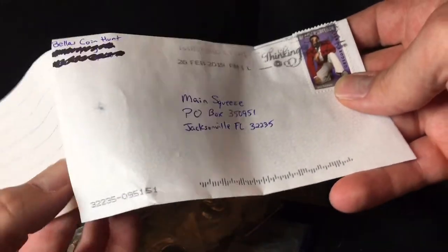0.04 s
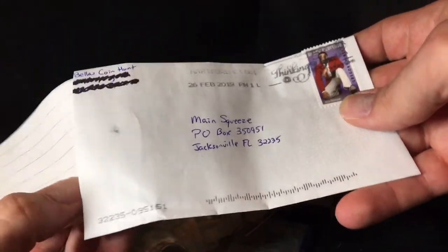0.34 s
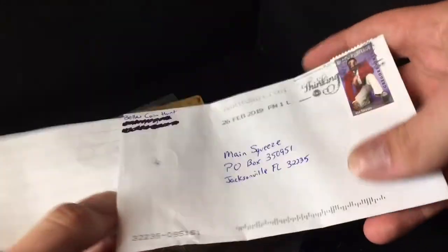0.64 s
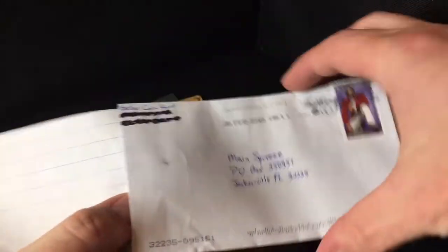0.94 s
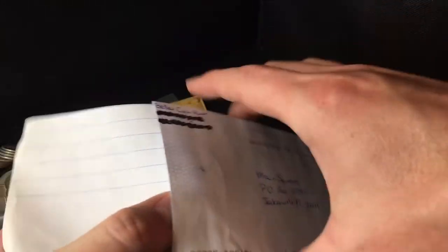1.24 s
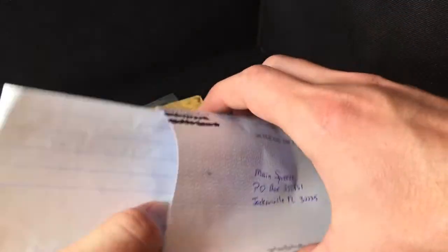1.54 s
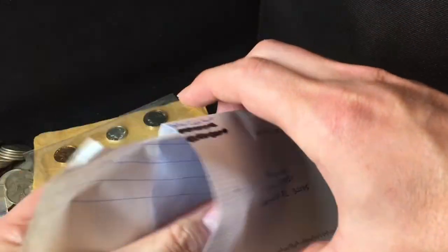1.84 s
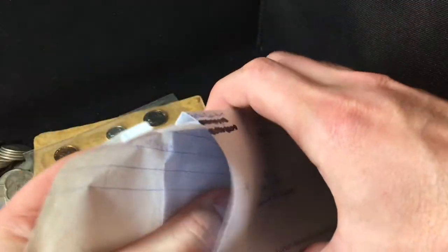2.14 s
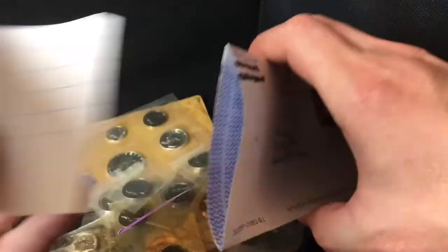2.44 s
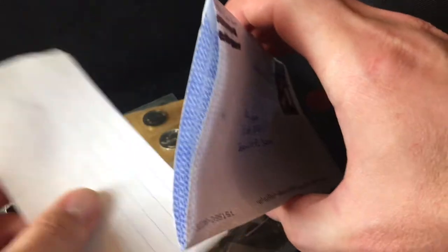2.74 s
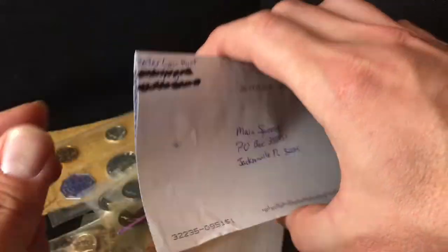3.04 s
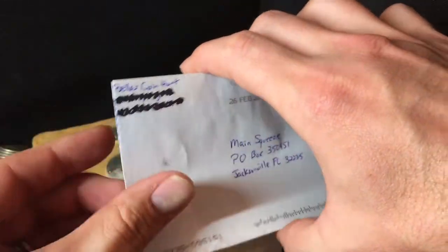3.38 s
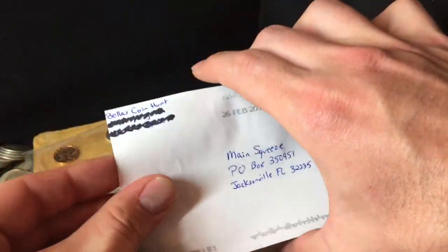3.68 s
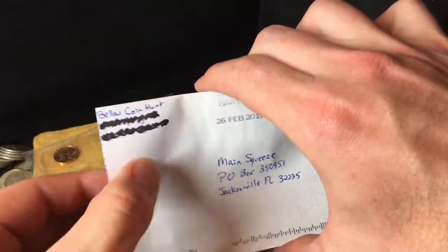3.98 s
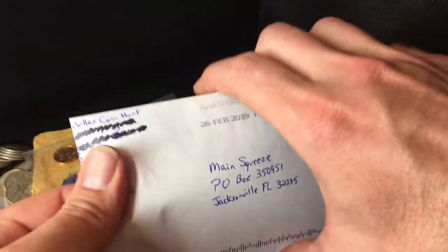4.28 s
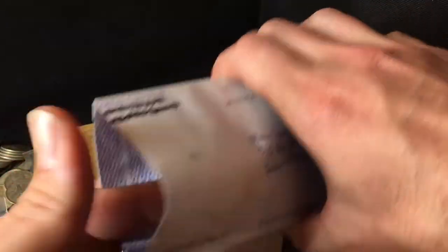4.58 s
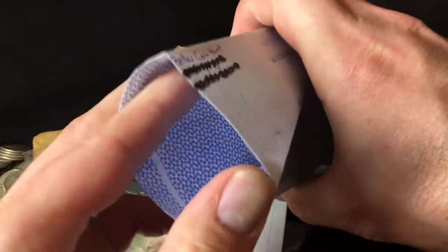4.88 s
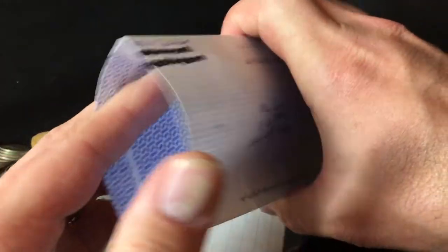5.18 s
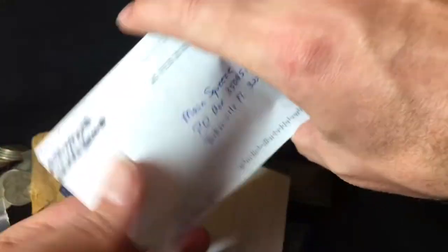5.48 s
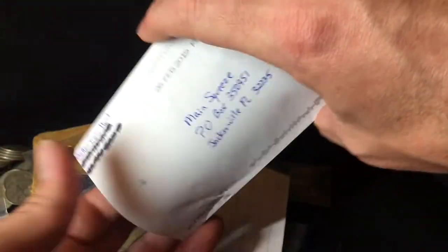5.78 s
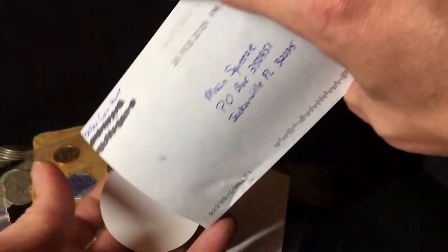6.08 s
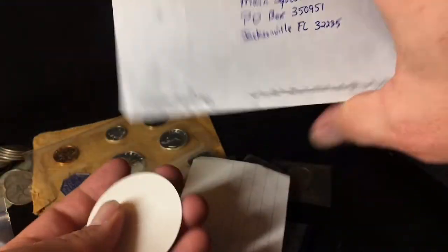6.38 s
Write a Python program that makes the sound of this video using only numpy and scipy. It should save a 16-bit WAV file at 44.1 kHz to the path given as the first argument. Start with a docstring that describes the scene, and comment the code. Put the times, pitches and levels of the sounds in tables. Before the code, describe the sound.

Hands pull a letter from a paper envelope and bend it open, with close rubbing, crisp crackles and soft puffs of air.

```python
"""Quiet, dead room: hands work a torn-open paper envelope close to a small microphone.
The envelope is bowed open, a letter slides out, and the envelope is flexed, fingered and tipped out.
Bent sheets buckle with dry snaps, fingertips bump them, and paper rubs on paper and skin,
all coloured by the envelope's hollow and the grip. Flapping sheets push soft puffs of air."""
import sys
import numpy as np
from scipy import signal
from scipy.fft import rfft, irfft
from scipy.io import wavfile
from scipy.ndimage import uniform_filter1d

SR = 44100
rng = np.random.default_rng(int(sys.argv[2]) if len(sys.argv) > 2 else 0)


def wrap_up_sound(samples):
    """Save the sound to the file named by the first command line argument, as 16-bit audio."""
    columns = np.atleast_2d(samples).T
    # keep every value between -1 and 1, then stretch to whole-number steps
    tamed = np.clip(columns, -1, 1)
    steps = np.round(tamed * 32767).astype(np.int16)
    wavfile.write(sys.argv[1], SR, steps)


N = 287532

# paper buckles: t/s, mid level over 10 ms/dB, bass re mid/dB, treble re mid/dB, build-up/s, ring f/Hz
BUCKLES = [(0.0359, -43, -10, -9, 0.0014, 1900), (0.1075, -50, -1.5, -4.5, 0.00035, 2290),
           (0.5236, -41, 1, 3, 0.00048, 4600), (0.5817, -44, -3, -5, 0.00054, 3430),
           (0.642, -53, -0.5, -2, 0.00079, 2400), (0.7601, -45.5, 5, -8, 0.00063, 1130),
           (0.7684, -38.5, -2.5, 0, .0006, 934), (0.8249, -45.5, -1.5, -1, 0.00078, 1060),
           (0.9454, -41, -5, -3, 0.00023, 4300), (1.1027, -45, 1.5, 2.5, 0.0012, 3100),
           (1.161, -51, -1, 8.5, 0.00054, 4100), (1.215, -48.5, -10, -1.5, .0005, 2330),
           (1.3664, -57.5, -1, 7.5, .0006, 4110), (1.4565, -47, -10, 6, .0003, 760),
           (1.4791, -42.5, -7.5, 3, .001, 1630), (1.5126, -22, -4, 0.5, 0.00027, 2580),
           (1.5201, -27.5, -17.5, 1.5, 0.0026, 2570), (1.5355, -28.5, -11.5, 0, 0.00043, 2800),
           (1.682, -37.5, -16.5, -8, 0.0058, 1470), (1.7916, -36.5, -7.5, -3, 0.0017, 2460),
           (1.8239, -37, -8, -8, 0.001, 2670), (1.906, -31.5, -21, -10, 0.0013, 2470),
           (1.9884, -26, -21, -14, .0004, 2270), (2.0278, -33.5, -10.5, -8.5, 0.00029, 2060),
           (2.1163, -33, -1, -3.5, 0.0005, 2050), (2.2889, -41.5, -7, 0.5, .0012, 2330),
           (2.525, -37.5, -24, 2.5, .005, 3480), (3.0105, -37, -7.5, 0, 0.0004, 2070),
           (3.125, -40, -6.5, -3, 0.0014, 3270), (3.619, -37.5, 7, 8, 0.0028, 639),
           (3.7835, -39.5, -5.5, 1.5, 0.0019, 4900), (3.8589, -42, -6, -1.5, .002, 1590),
           (3.901, -31, -6, 2.5, 0.0049, 2700), (3.946, -51.5, -8, 5.5, .001, 5880),
           (4.048, -56.5, 3.5, 8.5, 0.0017, 4800), (4.12, -44.5, -0.5, -9, 0.0022, 1630),
           (4.186, -37.5, -3.5, -7, 0.00036, 1260), (4.203, -43.5, -8, 0.5, .0005, 4050),
           (4.26, -34, -28, -7, .002, 1560), (4.3013, -28.5, -5.5, -1, 0.0015, 4130),
           (4.315, -23, -15, -7.5, 0.0034, 1600), (4.4577, -30.5, -8, -8.5, 0.0014, 3400),
           (4.4635, -30.5, -7.5, -14, 0.0017, 1590), (4.521, -39.5, -6.5, -11, 0.0013, 4120),
           (4.5342, -23, -13.5, -3, 0.0033, 4200), (4.6343, -28, -8, -8.5, 0.0024, 1420),
           (4.67, -33.5, -5, -8, 0.0017, 2630), (4.7209, -34, -17, -6, .002, 3780),
           (4.769, -30.5, -14, -7, 0.0019, 1670), (4.8108, -34.5, -2, -7, 0.0026, 560),
           (4.8552, -26.5, -8.5, -6, 0.0017, 2060), (4.869, -42, -3, 0, .0008, 1590),
           (4.9374, -34.5, -1, -3.5, 0.0013, 1340), (4.9448, -41, -10, -1.5, .0008, 3380),
           (5.019, -37, -6, 6.5, 0.00022, 4230), (5.271, -40, -23.5, -4, 0.003, 1780),
           (5.2826, -36, -20, -1.5, 0.0023, 1570), (5.347, -27, -11, -1.5, 0.00092, 3920),
           (5.4114, -34.5, -4.5, -6, .0017, 2320), (5.616, -37.5, -5.5, -18, 0.0035, 1340),
           (5.6301, -26, -8.5, -15, 0.0016, 1950), (5.6397, -23, -15.5, -9.5, 0.0033, 2200),
           (5.6887, -26, -25, -7, 0.00087, 3190), (5.7199, -24.5, -10, -17.5, 0.0012, 1960),
           (6.0353, -44.5, -4.5, -2, 0.0037, 1980), (6.287, -55.5, -5, -2, .001, 4640)]
# dull fingertip bumps: t/s, mid level over 10 ms/dB, ring f/Hz
BUMPS = [(1.599, -56.5, 700), (1.6341, -53, 460), (2.26, -50.5, 860), (3.219, -66, 292), (3.4952, -65, 281),
         (3.8185, -56.5, 1470), (4.6009, -47.5, 1250), (4.8945, -48, 1460), (5.249, -50.5, 580),
         (5.4369, -49, 930), (5.8119, -48, 1400), (6.2475, -61, 1810), (6.504, -65, 500)]
# finger strokes: t/s, length/s, mid level/dB, swell start to end/dB, treble re mid/dB
STROKES = [(0, 0.16, -62.5, -11.5, -3), (0.165, 0.14, -81.5, 8, 4.5), (0.294, 0.063, -68, 9.5, 0.5),
           (0.384, 0.18, -62, 19, 0), (0.515, 0.17, -59.5, -5, -3.5), (0.698, 0.046, -60.5, 9, -2),
           (0.735, 0.092, -51.5, 8.5, -2), (0.858, 0.23, -53, 8, 0.5), (1.115, 0.061, -55.5, -21, 0.5),
           (1.204, 0.027, -56.5, 1, -2), (1.253, 0.11, -76, -12, 5.5), (1.356, 0.093, -58.5, -15, 2.5),
           (1.454, 0.076, -34.5, 5.5, -4), (1.616, 0.15, -59.5, -15, 1.5), (3.022, 0.012, -57.5, -6.5, 1.5),
           (3.077, 0.042, -59.5, -5, 6), (3.14, 0.049, -69, -6, 1), (3.462, 0.047, -66.5, 6, 2.5),
           (3.591, 0.07, -47, 4.5, 1.5), (3.682, 0.24, -47.5, 1.5, -1.5), (3.915, 0.027, -66.5, 2, 2),
           (4.038, 0.21, -56, -11, 0), (4.155, 0.16, -46, 15, -12.5), (4.315, 0.11, -58.5, -26, -9),
           (4.432, 0.15, -55, -6, -1), (4.596, 0.071, -44, 7, -2.5), (4.695, 0.18, -50, 9.5, -8.5),
           (4.904, 0.14, -45.5, -3, -3.5), (5.05, 0.39, -72, -2.5, 0.5), (5.297, 0.084, -65.5, 20.5, -1),
           (5.392, 0.13, -54, -23, -2.5), (5.516, 0.082, -69, -5, 0.5), (5.614, 0.059, -41.5, -2, -6),
           (5.697, 0.036, -35.5, -14, -11.5), (5.733, 0.14, -52, 5.5, -7), (5.847, 0.162, -61, 6, 1),
           (6.044, 0.078, -53.5, 19, -1.5), (6.135, 0.088, -67.5, -25, 4), (6.276, 0.096, -65, -5.5, 6),
           (6.379, 0.13, -76, 21, -9)]
# two pulls on the letter, one curve each: t/s, relative mid level/dB, bass re mid/dB, treble re mid/dB
LETTER_PULLS = [
    [(1.72, -54.5, -6.5, -2), (1.795, -43.5, -9.5, 3), (1.984, -39, -8.5, -4.5), (2.056, -44.5, -8, -13.5),
     (2.147, -42.5, -4.5, -7), (2.19, -82, 5, -3)],
    [(2.222, -64.5, -3, -3), (2.3, -43.5, -21, -15), (2.328, -35, -6.5, 1), (2.39, -43.5, -17.5, 8.5),
     (2.541, -42.5, -3, 3), (2.568, -56, 2, -2), (2.655, -65, -6.5, 8), (2.711, -56.5, 2.5, -6),
     (2.82, -72.5, 6, 1.5), (2.92, -69, 0.5, -1)],
]
# peaks and dips of the envelope's hollow in the cupped hand: f/Hz, width/Hz, boost/dB
HOLLOW = [(333, 100, 7), (560, 130, 7.5), (700, 200, -5.5), (773, 80, 5), (1210, 31, -3.5), (1355, 34, 4),
          (1530, 47, 6.5), (2240, 280, 1), (2600, 220, -2.5), (4260, 510, 2)]
# two resonances per grip on the envelope: start t/s, lower f/Hz, boost/dB, upper f/Hz, boost/dB
GRIPS = [(0, 843, 7, 1130, 0), (1.422, 833, 8, 1480, 1), (1.62, 716, 4.5, 2480, 2),
         (2.199, 2140, 2, 2520, 7), (2.55, 808, 3.5, 5030, 1), (3.3, 1273, 4, 4350, 3),
         (4.031, 478, -3, 1430, 4), (4.42, 560, -3, 2100, -1), (5.58, 1300, 1, 2080, -1.5)]
# spectrum of buckling paper: f/Hz, relative level/dB
BUCKLE_COLOUR = [(150, -0.5), (280, -8), (550, -4.5), (1000, -5.5), (1800, -2), (3000, -0.5), (4500, 2),
                 (6000, 1.5), (7000, -2)]
# spectrum of sliding paper: f/Hz, relative level/dB
RUB_COLOUR = [(150, 3.5), (250, -6.5), (500, -3.5), (1000, -1), (2000, 2.5), (3000, 2), (4500, 2.5),
              (6000, 3.5), (7000, -2.5)]
# air pushed by a flipping face of the envelope: t/s, level/dB, f/Hz
PUFFS = [(0.931, -45, 69.4), (1.515, -41, 116), (2.519, -37.5, 87), (3.128, -47, 110), (3.499, -49.5, 45.6),
         (3.619, -38.5, 105), (3.905, -42.5, 97), (4.462, -39, 135), (4.639, -34, 112), (4.766, -33.5, 136),
         (4.8, -33.5, 93), (4.838, -33.5, 78.4), (4.977, -42, 95), (5.018, -36, 130), (5.265, -37.5, 113),
         (5.294, -39.5, 50), (5.347, -40.5, 108), (5.714, -39, 76.7), (6.107, -41, 100)]
# slow heave of hands and sheets: t/s, relative level/dB
HEAVE = [(0, -58.5), (.3, -64.5), (0.849, -54.5), (2.6, -55), (3.35, -64), (3.7, -55), (4.3, -53.5),
         (4.85, -47.5), (5.15, -60.5), (5.7, -50), (6.5, -60.5)]
# spectrum of still room air: f/Hz, relative level/dB
AIR_COLOUR = [(20, 14.5), (60, -12.5), (150, -11.5), (400, -12.5), (1000, -14.5), (3000, -46.5),
              (7000, -25.5)]


def buckling(crack=0.66, crack_build_s=0.0011, spread_s=.003, knock_s=0.00011, creep=0.44, ring_db=8.0):
    """A crease creeps, gives way with a crack, and the freed panel shivers for a few milliseconds."""
    lead_s, level_window_s, n = .03, .01, 4096
    t = (np.arange(n) - round(lead_s * SR)) / SR
    hz = np.fft.rfftfreq(n, 1 / SR)
    # the flipping panel knocks the hollow; its shiver carries little bass
    knock = evened((t >= 0) * np.exp(-abs(t) / knock_s))
    low_cut = signal.butter(1, 450, "highpass", fs=SR)
    # bending waves disperse: treble arrives first
    dispersion = np.exp(-2j * np.pi * np.sqrt(hz * spread_s))
    snap = evened(irfft(rfft(1. * (t == 0)) * dispersion, n))
    out = np.zeros(N)
    for at_s, mid_db, bass_db, treble_db, build_s, decay_s, ring_hz in blows():
        shape = np.where(t < 0, creep * np.exp(-abs(t) / build_s), np.exp(-abs(t) / decay_s))
        noise, clump_noise = rng.standard_normal((2, n))
        clumps_db = evened(uniform_filter1d(clump_noise, size=40))
        shiver = evened(signal.lfilter(*low_cut, noise * shape * amp(clumps_db)))
        # sudden buckles crack, slow ones crunch
        suddenness = 2 / (1 + (build_s + decay_s / 4) / crack_build_s)
        drive = shiver + crack * suddenness * (snap + 0.16 * knock)
        bands = radiate(drive, BUCKLE_COLOUR, [(ring_hz, ring_db)] + grip_rings(at_s))
        gains = amp(mid_db + np.array([bass_db, 0, treble_db]))
        add(out, at_s - lead_s, gains @ bands * np.sqrt(level_window_s * SR / n))
    return out


def blows(usual_db=-37.5, base_decay_s=0.0038, halving_db=40.5, linger=0.82):
    """Buckles, then fingertip bumps; hard buckles die sooner, slowly built ones linger."""
    for at_s, mid_db, bass_db, treble_db, build_s, ring_hz in BUCKLES:
        decay_s = (base_decay_s + linger * build_s) * 2 ** ((usual_db - mid_db) / halving_db)
        yield at_s, mid_db, bass_db, treble_db, build_s, decay_s, ring_hz
    bass_db, treble_db, build_s, decay_s = 4, -24, 0.00079, 0.0062
    for at_s, mid_db, ring_hz in BUMPS:
        yield at_s, mid_db, bass_db, treble_db, build_s, decay_s, ring_hz


def rubbing(finger_drag=0.82, letter_drag=.45, grain=0.47, judder_db=3.6, judder_hz=50, flutter_db=0.62):
    """Friction: crackle over fine hiss, juddering, coloured by each grip."""
    fingers, letter = finger_power(), letter_power()
    # fingers are grainy, the letter is smoother
    drag = (finger_drag * fingers[1] + letter_drag * letter[1]) / (fingers[1] + letter[1])
    crackle_share = grain * drag
    drive = np.sqrt(crackle_share) * fibre_crackle() + np.sqrt(1 - crackle_share) * rng.standard_normal(N)
    drive *= amp(judder_db * drag * wander(judder_hz))
    parts = np.split(drive, [round(grip[0] * SR) for grip in GRIPS[1:]])
    bands = np.hstack([radiate(part, RUB_COLOUR, grip_rings(grip[0]))
                       for part, grip in zip(parts, GRIPS)])
    # the contact point shifts, so the bands flutter apart
    return sum(band * np.sqrt(power) * amp(flutter_db * wander(judder_hz))
               for band, power in zip(bands, fingers + letter))


def fibre_crackle(catches_per_s=800, spread_db=4.0, decay_s=0.0011, click=0.13):
    """Fibres catch and let go; each catch briefly shakes the sheet."""
    catches = (rng.random(N) < catches_per_s / SR) * rng.choice([-1, 1], N)
    catches = catches * amp(spread_db * np.minimum(rng.exponential(1, N), 4))
    shake_power = signal.lfilter([1], [1, -np.exp(-2 / (decay_s * SR))], catches ** 2)
    shake = evened(np.sqrt(shake_power) * rng.standard_normal(N))
    return evened(shake + click * evened(catches))


def finger_power(attack_s=0.023, release_db_per_s=601, usual_db=-53, hold_db=-84.5):
    """Bass, mid and treble power of the strokes: each sets in, swells or eases, and is let go."""
    power = np.full((N, 3), amp(hold_db) ** 2)  # paper creeping in still hands
    t = np.arange(SR // 2) / SR
    for at_s, length_s, mid_db, swell_db, treble_db in STROKES:
        held_db = mid_db + swell_db * (np.minimum(t / length_s, 1) - .5)
        release_db = release_db_per_s * np.maximum(t - length_s, 0)
        gain = np.minimum(t / attack_s, 1) * amp(held_db - release_db)
        bass_db = -1.5 - 0.38 * (mid_db - usual_db) - 0.39 * treble_db  # harder, brighter: thinner
        add(power, at_s, np.outer(gain, amp([bass_db, 0, treble_db])) ** 2)
    return power.T


def letter_power(trim_db=-.5, fade_s=0.011):
    """Bass, mid and treble power of the letter sliding against the envelope."""
    power = np.zeros((3, N))
    for pull in LETTER_PULLS:
        at_s, mid_db, bass_db, treble_db = np.transpose(pull)
        moving = follow([at_s[0] - fade_s, at_s[0], at_s[-1], at_s[-1] + fade_s], [0, 1, 1, 0])
        power += [(moving * amp(follow(at_s, trim_db + mid_db + db))) ** 2
                  for db in (bass_db, 0, treble_db)]
    return power


def radiate(drive, colour, rings, ring_width=0.2, edges_hz=(150, 900, 3000, 7400)):
    """Hollow and rings (f/Hz, boost/dB) colour a drive; returns bass, mid and treble, each of rms 1."""
    n = len(drive)
    hz = np.fft.rfftfreq(n, 1 / SR)
    resonances = list(HOLLOW) + [(f, ring_width * f, boost_db) for f, boost_db in rings]
    db = spectrum_db(colour, hz)
    for centre_hz, width_hz, boost_db in resonances:
        db += boost_db / (1 + (2 * (hz - centre_hz) / width_hz) ** 2)
    # minimum phase: no ringing before the strike
    cepstrum = irfft(np.log(amp(db)), n)
    cepstrum[1:n // 2] *= 2
    cepstrum[n // 2 + 1:] = 0
    spectrum = rfft(drive) * np.exp(rfft(cepstrum))
    above = [1 / (1 + (edge_hz / (hz + 1)) ** 8) for edge_hz in edges_hz]
    return np.array([evened(irfft(spectrum * (low - high), n)) for low, high in zip(above, above[1:])])


def grip_rings(at_s):
    """The two resonances (f/Hz, boost/dB) of the envelope as the current grip bends it."""
    held = sum(at_s >= grip[0] for grip in GRIPS[1:])
    return [GRIPS[held][1:3], GRIPS[held][3:5]]


def puffing(trim_db=-1, stir_band_hz=(18, 45), lumps_db=4.0, lumps_hz=16):
    """Moving sheets stir the air; a flipping face gives one push and pull."""
    band_pass = signal.butter(1, stir_band_hz, "bandpass", fs=SR, output="sos")
    stir = signal.sosfilt(band_pass, rng.standard_normal(N))
    stir = signal.sosfilt(signal.butter(2, 190, fs=SR, output="sos"), stir)
    heave_db = follow(*np.transpose(HEAVE)) + trim_db
    out = evened(stir * amp(lumps_db * wander(lumps_hz))) * amp(heave_db)
    t = np.arange(4096) / SR
    for at_s, db, hz in PUFFS:
        shape = 2 * hz * t * np.exp(1 - 2 * hz * t)
        add(out, at_s, amp(db) * shape * np.sin(2 * np.pi * hz * t))
    return out


def room_echoes(x, near_db=-14, near_t60_s=0.0077, far_db=-23, far_t60_s=0.066):
    """Quick scatter from hands and table, then a weak short tail."""
    t = np.arange(SR // 3) / SR
    response = np.zeros(len(t))
    for db, t60_s in (near_db, near_t60_s), (far_db, far_t60_s):
        scatter = rng.standard_normal(len(t)) * (t > .003) * amp(-60 * t / t60_s)
        response += amp(db) * scatter / np.linalg.norm(scatter)
    return signal.fftconvolve(x, response)[:N]


def room_air(level_db=-64.5):
    """Faint steady noise of the room."""
    colour = amp(spectrum_db(AIR_COLOUR, np.fft.rfftfreq(N, 1 / SR)))
    return amp(level_db) * evened(irfft(rfft(rng.standard_normal(N)) * colour, N))


def amp(db):
    """Decibels to gain."""
    return 10 ** (np.asarray(db) / 20)


def evened(x):
    """Scales to rms 1."""
    return x / np.sqrt(np.mean(x ** 2) + 1e-20)


def spectrum_db(points, hz):
    """Interpolates a spectrum over log frequency."""
    points_hz, db = np.transpose(points)
    return np.interp(np.log(hz + 1), np.log(points_hz + 1), db)


def follow(times_s, values):
    """Curve points to one value a sample."""
    return np.interp(np.arange(N) / SR, times_s, values)


def add(mix, at_s, sound):
    """Mixes a sound in place."""
    part = mix[max(round(at_s * SR), 0):][:len(sound)]
    part += sound[:len(part)]


def wander(rate_hz):
    """Smooth random curve of rms 1, rolling off at rate_hz."""
    hz = np.fft.rfftfreq(N, 1 / SR)
    return evened(irfft(rfft(rng.standard_normal(N)) * np.exp(-(hz / rate_hz) ** 2), N))


def scene():
    """Paper close by, in its room; mono."""
    paper = rubbing() + buckling()
    return (paper + room_echoes(paper) + puffing() + room_air())[None]


def record(dry, ceiling=.8, cutoff_hz=6950):
    """A narrow-band recorder rounds off the loudest crack and cuts the top steeply."""
    rounded = ceiling * np.tanh(dry / ceiling)
    low_pass = signal.firwin(301, cutoff_hz, window=("kaiser", 7), fs=SR)
    return signal.oaconvolve(rounded, low_pass[None], "same")


dry = scene()
out = record(dry)
wrap_up_sound(out)
```